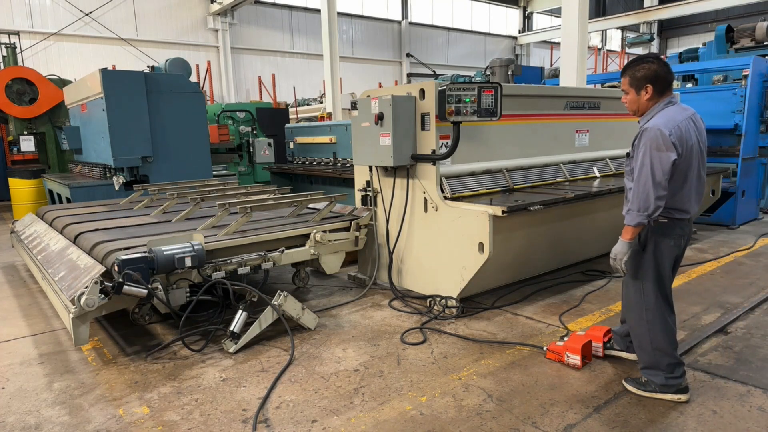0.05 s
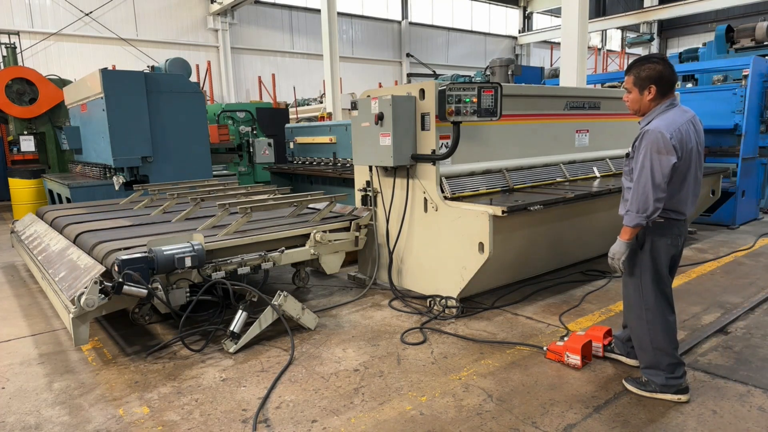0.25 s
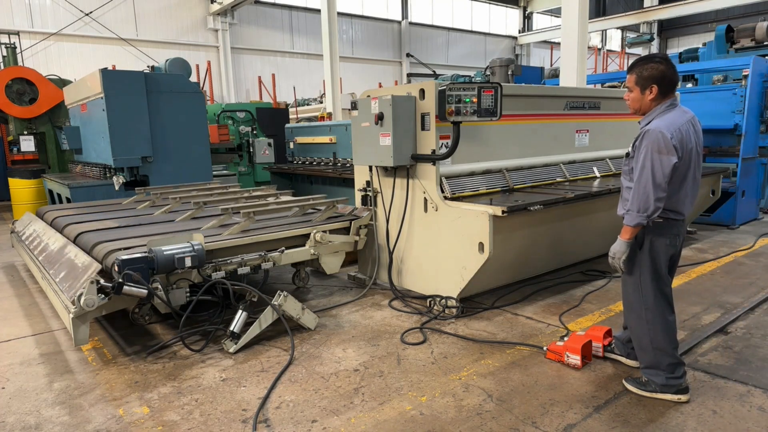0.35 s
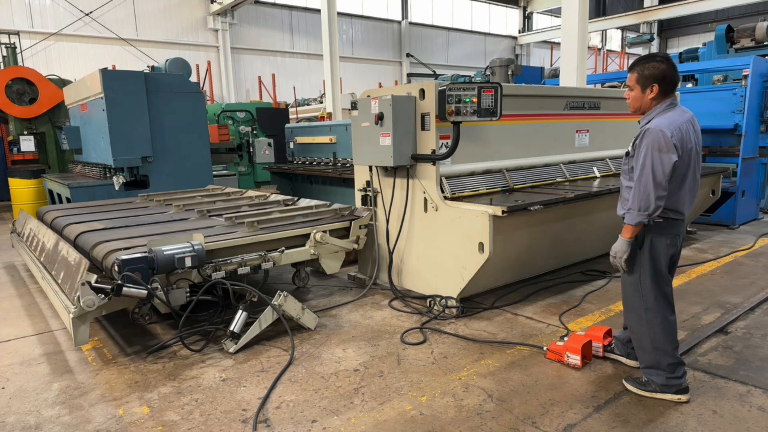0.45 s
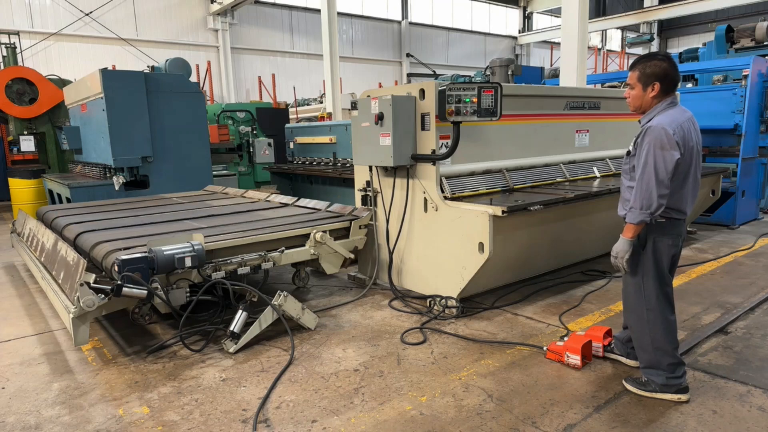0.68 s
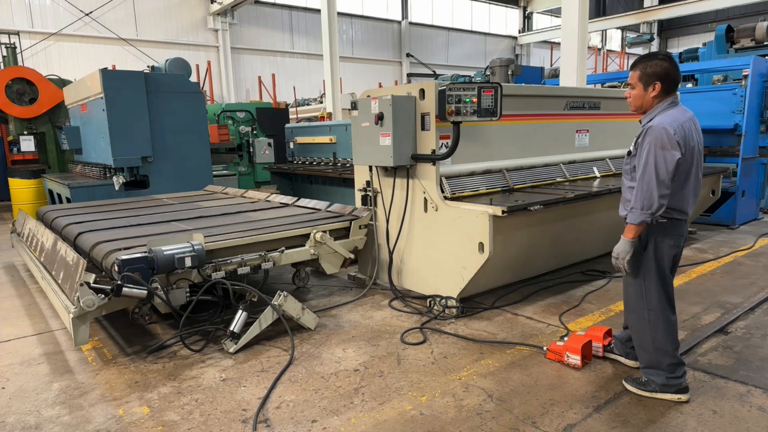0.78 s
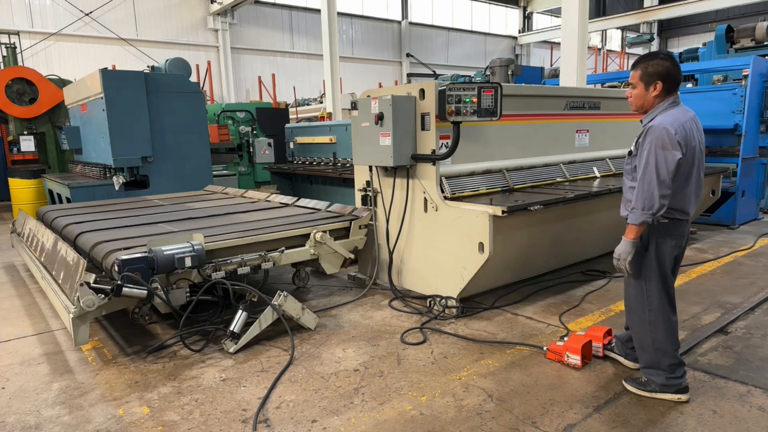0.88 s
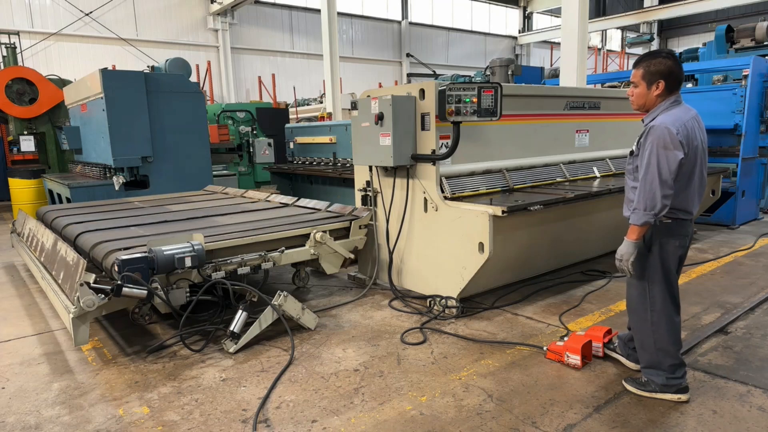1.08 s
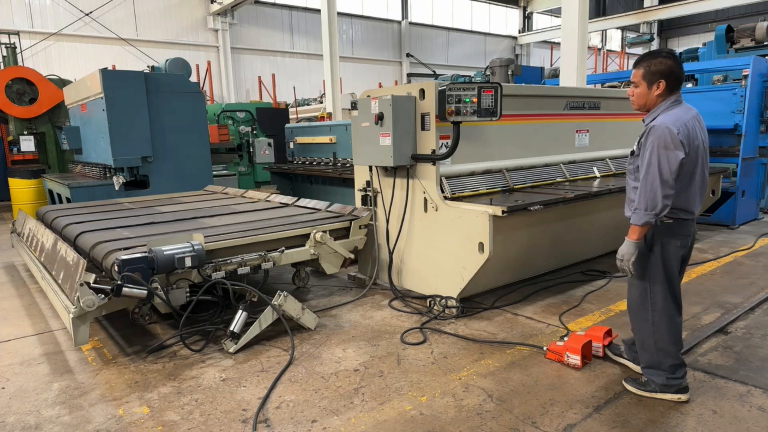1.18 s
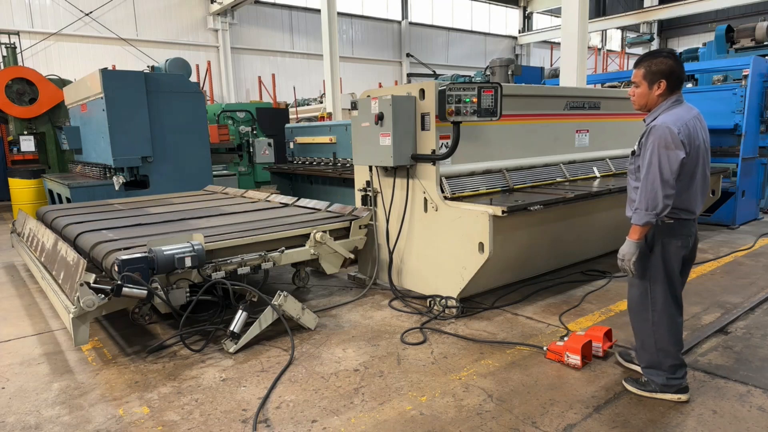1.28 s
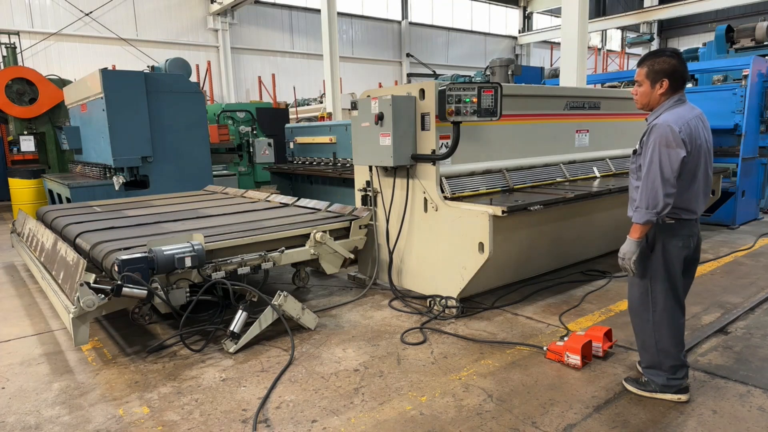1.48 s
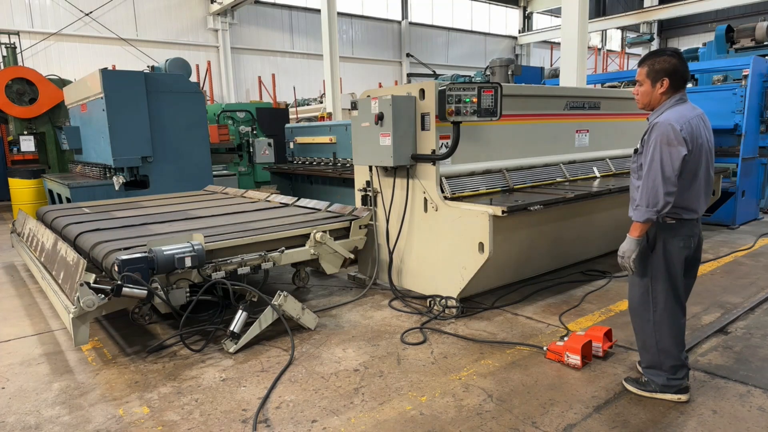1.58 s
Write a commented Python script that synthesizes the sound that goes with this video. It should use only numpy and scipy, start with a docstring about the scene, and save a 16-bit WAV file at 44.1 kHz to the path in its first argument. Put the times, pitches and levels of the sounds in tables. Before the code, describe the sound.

In a big, humming machine hall, a hydraulic shear gives a thin squeak and a whistling hiss of air. Its steel table falls with one heavy, ringing bang, followed by a bright latch clank.

```python
"""Hydraulic sheet shear in a large hall.

A thin squeak, then a valve squeals and air hisses, with narrow whistles in it. The steel table drops in
six quick blows: a heavy bang that rings its modes and rolls round the hall. A latch clanks and rings.
A slow machine throbs and a motor whines throughout, over steady hall noise. The broad noise dips
briefly three times while the tones carry on."""
import sys
import numpy as np
from scipy import signal
from scipy.fft import rfft, irfft
from scipy.io import wavfile
from scipy.ndimage import uniform_filter1d

SR = 44100
rng = np.random.default_rng(int(sys.argv[2]) if len(sys.argv) > 2 else 0)


def dump(signal):
    """Clip the signal to [-1, 1] and save it as 16-bit WAV at the path in sys.argv[1]."""
    limited = np.clip(np.atleast_2d(signal).T, -1, 1)
    pcm = np.round(limited * 32767).astype(np.int16)
    wavfile.write(sys.argv[1], SR, pcm)


N = 72765

# table blows (time [s], level [dB], tilt [dB/octave], crack pitch [Hz])
TABLE_BLOWS = [(0.7355, -13.5, 0.5, 2140), (0.744, -19, 1, 5340), (0.751, -20, 0.5, 586),
               (0.768, -18, -1, 910), (0.786, -19, -0.5, 297), (0.813, -19, 1.9, 1590)]
# bang spectrum (frequency [Hz], density [dB])
BANG_SPECTRUM = [(24, -49), (40, -28), (130, -7), (163, -2.5), (204, -10), (305, -3), (345, -8), (942, -5),
                 (1270, -10.5), (6650, -22), (16000, -29)]
# hall decay (frequency [Hz], T60 [s])
HALL_DECAY = [(60, 1.17), (200, 2.25), (700, 1.7), (2000, 1.59), (5000, 1.05), (12000, 0.31)]
# steel table modes (frequency [Hz], gain [dB], T60 [s])
TABLE_MODES = [(66, -18, 3.7), (92.1, -11.5, 2.23), (124, -20, 1.4), (166, -4.5, 1.7), (175.2, -7, 2.73),
               (298.4, -14, 1.1), (430.8, -14, 2.23), (536, -5, 0.58), (734, -21, 1.7), (846, -16, 1.8),
               (905, -17.5, 1.2), (940, -9.5, 1.95), (1014, -14, 1.9), (1935, -2, 0.063), (2810, -6, 0.084),
               (3630, -14, .6), (4540, -16, 1.2), (6740, -17, 1.06)]
# air hiss (time [s], level [dB], lift at 10 kHz [dB])
AIR_ENVELOPE = [(.224, -46, -1.5), (.228, -36.5, 6), (.25, -28.5, 9.5), (.262, -51, 15), (.28, -42, 15.5),
                (.296, -13, -16.5), (.31, -32, 8), (.352, -25.5, -1), (.426, -32.5, 5), (.578, -30.5, 6),
                (.726, -32, 4.5), (.8, -35, -3), (.9, -26.5, -16), (1.0, -43.5, 3.5)]
# hiss spectrum (frequency [Hz], density [dB])
AIR_SPECTRUM = [(530, -33), (900, -28), (944, -11), (2360, -6.5), (2600, -5), (3190, -7.5), (4050, 2),
                (7230, -4.5), (10000, -2.5), (16000, -14)]
# pipe whistles (frequency [Hz], width [Hz], gain [dB])
PIPE_WHISTLES = [(4086, 106, -12.5), (4600, 77, -11.5), (5510, 140, -13), (5950, 340, -10.5)]
# valve squeal (time [s], level [dB])
SQUEAL_ENVELOPE = [(.238, -42), (.249, -12.5), (.256, -27), (.261, -20), (.266, -21.5), (.272, -28),
                   (.285, -36), (.34, -29), (.37, -52)]
# opening squeak (time [s], level [dB])
SQUEAK_ENVELOPE = [(.105, -60), (.113, -34), (.155, -37), (.165, -54), (.215, -46)]
# latch hits (time [s], level [dB])
LATCH_HITS = [(1.026, -48.5), (1.3243, -21), (1.342, -54), (1.366, -26.5), (1.429, -37.5)]
# clank spectrum (frequency [Hz], density [dB])
CLANK_SPECTRUM = [(470, -68), (800, -22), (907, -13), (1920, -10.5), (3650, -13), (4080, -12.5), (5580, -6),
                  (9220, -16.5), (16000, -25)]
# latch modes (frequency [Hz], gain [dB], T60 [s])
LATCH_MODES = [(1655, -5, .45), (3058, -12, .4), (4350, -5, .5), (4610, -9, .6), (5410, -4, .6),
               (5960, -5, .3), (7110, -9, .4), (7763, -11, .4), (8138, -1, .35), (8972, -6, .35),
               (9400, -8, .3), (10150, -12, .15), (11245, -8, .45), (11520, -11, .2), (12070, -14, .2),
               (13440, -13, .2), (13910, -15, .2)]
# machine knocks (phase [cycles], gain [dB])
KNOCKS = [(0, 13), (0.332, 11), (0.682, 1)]
# casing modes (frequency [Hz], gain [dB], T60 [s])
CASING_MODES = [(69.4, -10.5, 0.42), (172.3, -3.5, 0.23), (209.8, -7, 0.46), (234.7, -10.5, 0.31),
                (285.6, -9.5, 0.23), (328.8, -2, 0.084), (395, -16.5, 0.23)]
# motor whine (time [s], level [dB])
WHINE_ENVELOPE = [(0, -44), (.74, -42), (1.1, -49), (1.65, -45)]
# hall noise spectrum (frequency [Hz], density [dB])
HALL_SPECTRUM = [(18, -45), (30, -12.5), (243, -2.5), (970, -17.5), (1110, -19), (1400, -18.5),
                 (1680, -18.5), (1820, -22), (2180, -19), (3780, -20.5), (4310, -22), (7260, -33.5),
                 (8720, -29), (15500, -69)]
# dips in the broad noise (centre [s], half length [s], gain [dB], lower edge [Hz])
NOISE_DIPS = [(.328, .016, -34, 30), (1.085, .011, -13, 3000), (1.405, .013, -11, 30)]


def amp(db):
    return 10 ** (np.asarray(db) / 20)


def unit_rms(x):
    return x / np.sqrt(np.mean(x ** 2) + 1e-20)


def since(start_s):
    return np.maximum(np.arange(N) / SR - start_s, 0)


def at_hz(points, hz):
    knots_hz, values = np.transpose(points)
    return np.interp(np.log(hz + 1), np.log(knots_hz + 1), values)


def envelope(points):
    rows = np.array(points)
    return amp(np.interp(since(0), rows[:, 0], rows[:, 1]))


def noise(spectrum, tilt_db=0, ripple_db=4, ripple_step_hz=30.24):
    """Coloured noise, RMS 1, rippled: the hall favours many close pitches."""
    hz = np.fft.rfftfreq(N, 1 / SR)
    knots_hz = np.arange(0, SR / 2, ripple_step_hz)
    ripple = unit_rms(np.interp(hz, knots_hz, rng.standard_normal(3000)[:len(knots_hz)]))
    colour_db = at_hz(spectrum, hz) + tilt_db * np.log2((hz + 50) / 1000)
    gain = amp(colour_db + ripple_db * ripple * hz / (hz + 900))
    return unit_rms(irfft(rfft(rng.standard_normal(N)) * gain, N))


def shaped(x, gain):
    """Apply gain(hz, t) to the short-time spectrum."""
    hz, t, frames = signal.stft(x, SR, nperseg=512, noverlap=448)
    return signal.istft(frames * gain(hz[:, None], t[None]), SR, nperseg=512, noverlap=448)[1][:N]


def whistle(hz, width_hz, steady=0):
    """Noise in a narrow resonance plus an optional steady tone, RMS 1."""
    pole = np.exp(-np.pi * width_hz / SR)
    drive = rng.standard_normal(N) + 1j * rng.standard_normal(N)
    waver = signal.lfilter([1], [1, -2 * pole, pole ** 2], drive)
    phasor = waver / np.sqrt(np.mean(abs(waver) ** 2)) + steady * np.exp(2j * np.pi * rng.random())
    return unit_rms((phasor * np.exp(2j * np.pi * hz * since(0))).real)


def ring(modes, hits, rise_cycles, relative_width):
    """Struck modes waver and decay; low ones swell more slowly."""
    ringing = np.zeros(N)
    for hz, db, t60_s in modes:
        power = np.zeros(N)
        for start_s, hit_db, tilt_db in hits:
            age_s = since(start_s)
            decay = amp(hit_db + tilt_db * np.log2(hz / 1000) - 60 * age_s / t60_s)
            power += decay ** 2 * (1 - np.exp(-age_s * hz / rise_cycles))
        ringing += amp(db) * np.sqrt(power) * whistle(hz, relative_width * hz + 4, steady=0.6)
    return ringing


def table_drop(crack_t60_s=0.18, crack_octaves=0.62, near_t60_s=0.072, swell_s=0.015, attack_s=0.0018):
    """Each blow gives a pitched crack, a near crash and a long hall roll, and rings the table."""
    bang = np.zeros(N)
    for start_s, db, tilt_db, crack_hz in TABLE_BLOWS:
        def fade(hz, t):
            age_s = np.maximum(t - start_s, 0)
            band = np.exp(-(np.log2((hz + 1) / crack_hz) / crack_octaves) ** 2)
            crack = band * amp(9 - 60 * age_s / crack_t60_s)
            near = amp(-60 * age_s / near_t60_s)
            roll = amp(-1 - 60 * age_s / at_hz(HALL_DECAY, hz))
            return crack + (near + roll) * (1 - np.exp(-age_s / swell_s))
        attack = np.minimum(since(start_s) / attack_s, 1)
        bang += amp(db) * attack * shaped(noise(BANG_SPECTRUM, tilt_db), fade)
    hits = [blow[:3] for blow in TABLE_BLOWS]
    return bang, amp(-7) * ring(TABLE_MODES, hits, rise_cycles=2.9, relative_width=0.026)


def air():
    """Air hisses with changing brightness; pipe whistles follow its smoothed level."""
    level = envelope(AIR_ENVELOPE)
    times_s, _, lift_db = np.transpose(AIR_ENVELOPE)
    hiss = shaped(noise(AIR_SPECTRUM), lambda hz, t: amp(np.interp(t, times_s, lift_db) * hz / 10000))
    pipes = sum(amp(db) * whistle(hz, width_hz, steady=0.6) for hz, width_hz, db in PIPE_WHISTLES)
    return level * hiss, uniform_filter1d(level, 1500) * pipes


def valve_tone(points, hz, width_hz, steady=0):
    """Squeal or squeak: one narrow resonance, gated to the span of its envelope."""
    t = since(0)
    gate = (t > points[0][0]) & (t <= points[-1][0])
    return gate * envelope(points) * whistle(hz, width_hz, steady)


def latch(clank_t60_s=0.063, tail_t60_s=1, double_decay_hz=8000, attack_s=0.005):
    """Each hit gives a bright clank with a dulling tail and rings small steel parts."""
    clanks = np.zeros(N)
    for start_s, db in LATCH_HITS:
        def fade(hz, t):
            age_s = np.maximum(t - start_s, 0)
            tail = amp(-3.5 - 60 * age_s * (1 + hz / double_decay_hz) / tail_t60_s)
            return amp(-60 * age_s / clank_t60_s) + tail
        attack = np.minimum(since(start_s) / attack_s, 1)
        clanks += amp(db) * attack * shaped(noise(CLANK_SPECTRUM), fade)
    hits = [(start_s, db, 0) for start_s, db in LATCH_HITS]
    return clanks, amp(-6.5) * ring(LATCH_MODES, hits, rise_cycles=9.5, relative_width=0.003)


def machine_throb(cycle_hz=12.99, offset_s=0.043, spread_db=1.5, rise_s=0.0024):
    """A slow machine knocks its casing in an uneven three-beat."""
    lead = SR // 2  # already ringing at t = 0
    cycles = cycle_hz * (np.arange(-lead, N) / SR - offset_s)
    knocks = sum(amp(db) * np.diff(np.floor(cycles - phase), prepend=0).clip(0, 1)
                 for phase, db in KNOCKS)
    knocks *= amp(spread_db * rng.standard_normal(len(cycles)))
    age_s = np.arange(lead) / SR
    casing = sum((-1) ** k * amp(db - 60 * age_s / t60_s) * np.sin(2 * np.pi * hz * age_s)
                 for k, (hz, db, t60_s) in enumerate(CASING_MODES))
    casing *= 1 - np.exp(-age_s / rise_s)
    return amp(-31.5) * unit_rms(signal.fftconvolve(knocks, casing)[lead:lead + N])


def motor_whine(hz=597.5):
    """A motor holds one tone with a slight waver."""
    tone = np.sqrt(2) * np.sin(2 * np.pi * hz * since(0))
    return envelope(WHINE_ENVELOPE) * (tone + 0.17 * whistle(hz, width_hz=15))


def hall_noise():
    """Steady, mostly low noise of the hall."""
    return amp(-33.5) * noise(HALL_SPECTRUM)


def dip_gain(hz, t):
    """Brief level dips, each above its own edge frequency."""
    return amp(sum(db * np.clip(1 - ((t - centre_s) / half_s) ** 4, 0, 1) / (1 + (edge_hz / (hz + 1)) ** 6)
                   for centre_s, half_s, db, edge_hz in NOISE_DIPS))


def scene():
    """All sources, the same in both channels."""
    hiss, pipes = air()
    squeal = valve_tone(SQUEAL_ENVELOPE, hz=6070, width_hz=300)
    bang, table_ring = table_drop()
    clanks, latch_ring = latch()
    broad = shaped(bang + hiss + clanks + hall_noise(), dip_gain)
    machines = machine_throb() + motor_whine()
    squeak = valve_tone(SQUEAK_ENVELOPE, hz=4310, width_hz=29, steady=0.67)
    mono = broad + table_ring + pipes + squeal + squeak + latch_ring + machines
    return np.array([mono, mono])


def record(dry, low_cut_hz=20, ceiling=1.1, high_cut_hz=15740):
    """Low cut, soft overload, band limit."""
    cut = signal.sosfilt(signal.butter(2, low_cut_hz, "high", fs=SR, output="sos"), dry)
    soft = cut / (1 + (abs(cut) / ceiling) ** 4) ** 0.25
    lowpass = signal.firwin(511, high_cut_hz, window=("kaiser", 9), fs=SR)
    return signal.oaconvolve(soft, lowpass[None], "same")


dry = scene()
out = record(dry)
dump(out)
```